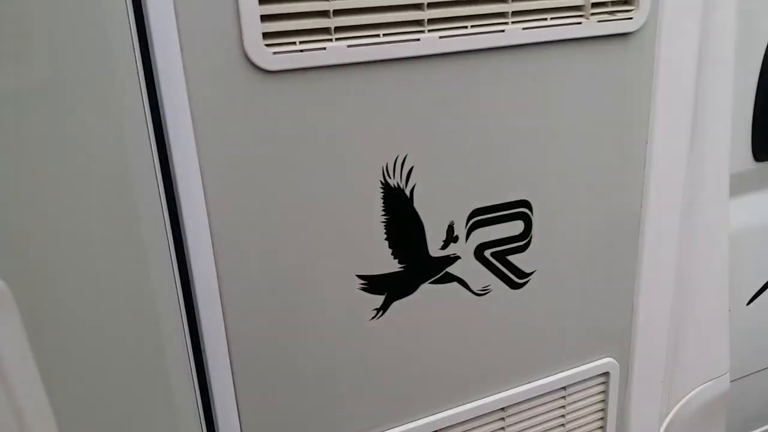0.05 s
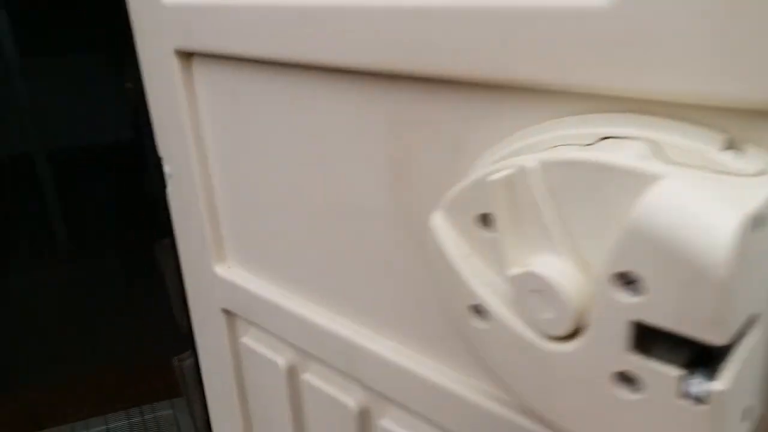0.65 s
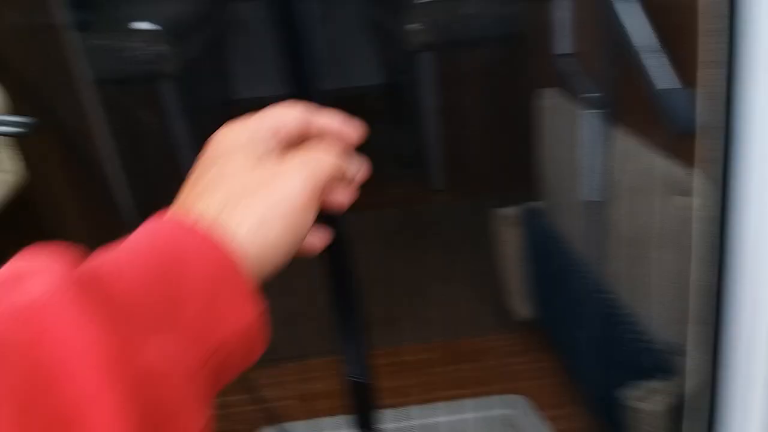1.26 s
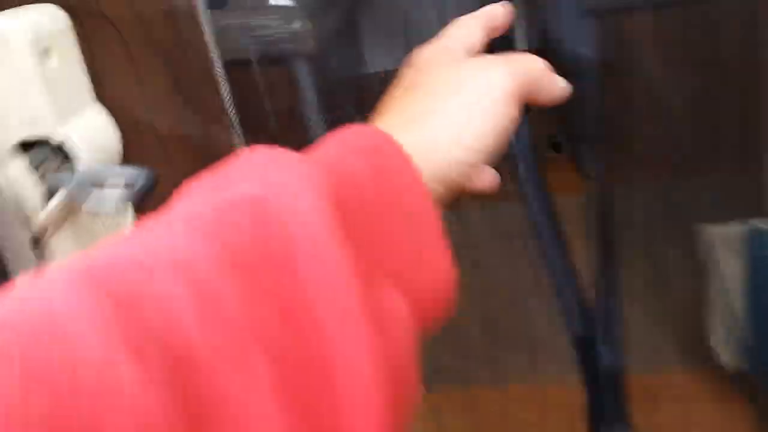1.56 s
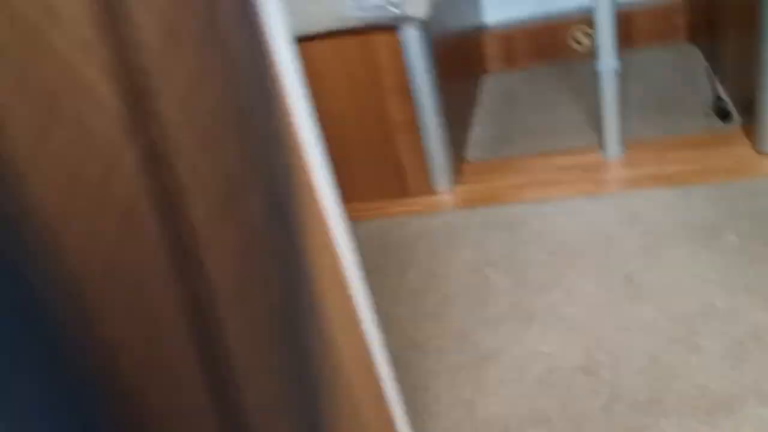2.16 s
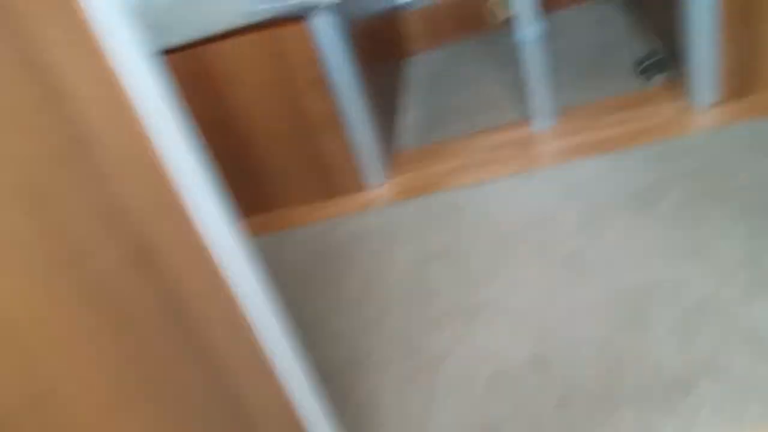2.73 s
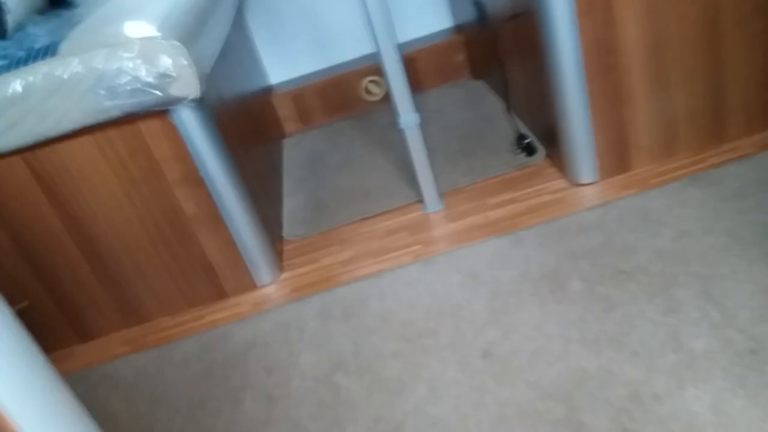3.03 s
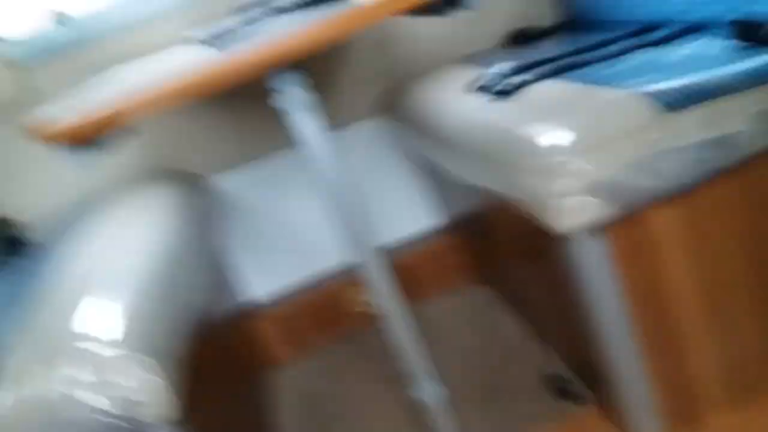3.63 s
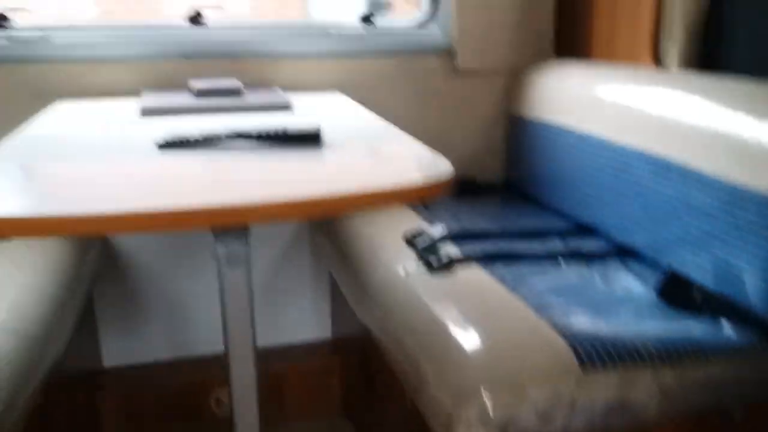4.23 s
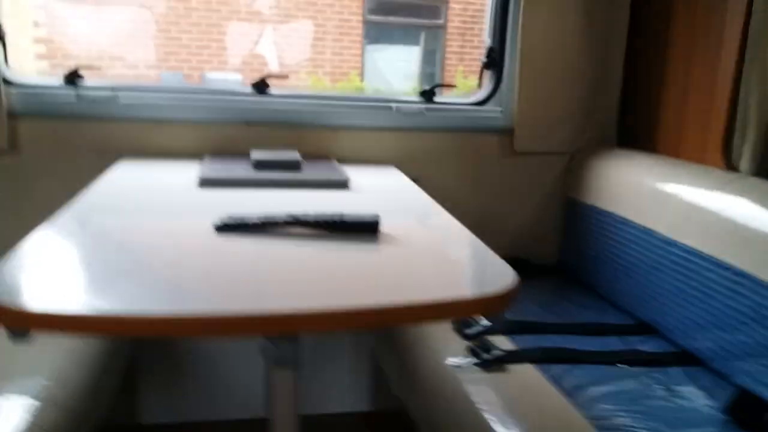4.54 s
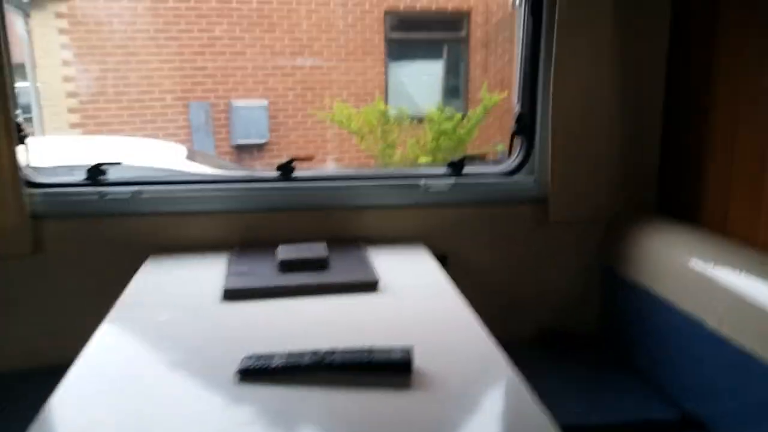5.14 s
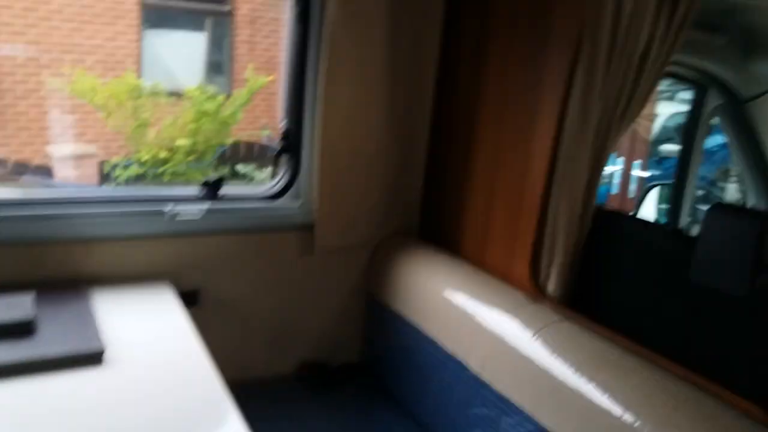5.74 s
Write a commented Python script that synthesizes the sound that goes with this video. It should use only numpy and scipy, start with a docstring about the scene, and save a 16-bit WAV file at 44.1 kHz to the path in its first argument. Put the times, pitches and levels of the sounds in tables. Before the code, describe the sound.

A stiff jacket rustles and snaps right at the microphone as someone enters a motorhome. At first a bird chirps faintly over a far road, wind puffs once and the door barely squeaks. A plastic door fitting clacks close by, then feet knock on the hollow floor while a hand rubs and rumbles on the microphone. Near the end, short hissing scrapes sound in the small cabin.

```python
"""A stiff jacket rustles and snaps right at the microphone, its folds buckling as the wearer carries
a camera through a motorhome doorway. Wind puffs once on one side of the microphone, the door squeaks
faintly, a plastic fitting clacks close by, feet knock on the hollow floor and the hand rubs and
rumbles on the camera. At first a bird chirps outside over a far road; near the end a run of short,
hissing scrapes sounds in the small cabin."""
import sys
import numpy as np
from scipy import signal
from scipy.fft import rfft, irfft
from scipy.io import wavfile
from scipy.ndimage import uniform_filter1d

SR = 44100
rng = np.random.default_rng(int(sys.argv[2]) if len(sys.argv) > 2 else 0)


def master_out(mix):
    """Clip the mix to full scale and print it as 16-bit PCM to the path in sys.argv[1]."""
    frames = np.transpose(np.atleast_2d(mix))
    ceiling = np.clip(frames, -1, 1)
    pcm = np.round(ceiling * 32767).astype(np.int16)
    wavfile.write(sys.argv[1], SR, pcm)


N = 259749
TIME = np.arange(N) / SR
SHORT, LONG = TIME[:2048], TIME[:16384]
MIDDLING_DB = -30  # a snap or thump of ordinary strength

# body movement: t/s, sliding cloth/dB, rubbing hand/dB
BODY_MOTION = [(0, -72, -68), (.22, -73, -64), (.27, -54, -62.5), (.44, -53, -53.5), (.65, -50, -57),
               (.71, -66, -63), (.79, -51.5, -56.5), (.87, -66, -60.5), (.9, -46, -53), (1.18, -47, -50.5),
               (1.23, -65, -64), (1.49, -59, -61), (1.55, -46, -52), (1.76, -42, -51), (1.81, -33, -50.5),
               (1.91, -42, -51.5), (2.03, -35, -50), (2.1, -51, -49.5), (2.42, -45, -55.5),
               (2.78, -51, -56.5), (2.93, -39.5, -55), (3.3, -50, -60), (3.52, -37, -54), (3.65, -49, -56),
               (4.1, -43.5, -54.5), (4.3, -55.5, -60), (4.5, -57, -57), (4.82, -51, -55),
               (4.96, -55.5, -67.5), (5.26, -60, -65), (5.5, -54, -49), (5.66, -58, -62), (5.89, -72, -80)]
# steps, bumps and, at 0.44 s, a low puff of wind on one side of the microphone:
# t/s, peak level/dB, lowest f/Hz, highest f/Hz, panel ring/dB, left-right/dB
THUMPS = [(.362, -35, 1010, 1590, -18, -5), (.440, -31, 75, 235, -7.5, 27),
          (0.558, -42.5, 69, 382, 4, 10.5), (0.653, -45.5, 160, 473, 8.5, 7), (.894, -40, 376, 563, 3.5, 5),
          (1.021, -28.5, 69.6, 715, -9, 7), (1.422, -43, 59.6, 132, -16, 25),
          (1.483, -43.5, 59.6, 110, -8, 24), (1.591, -24.5, 153, 425, -8, 3),
          (2.147, -25.5, 133, 406, 0.5, 2), (2.533, -34.5, 220, 900, -35, -14.5),
          (2.693, -39, 190, 384, -7, 4), (2.953, -25.5, 300, 2240, 2, -19), (2.98, -27, 131, 670, -4, -14),
          (3.371, -12.5, 121, 298, -8.5, 2.5), (3.731, -33, 400, 1700, -14.5, 6),
          (3.796, -27, 119, 940, -14, 5), (3.9863, -19, 470, 1910, -5.5, 5.5),
          (4.335, -10, 206, 503, -0.5, 4.5), (4.364, -24.5, 204, 300, 5.5, -1),
          (4.414, -31, 203, 380, -9, 3), (4.448, -37.5, 210, 380, -1, 2), (4.619, -21, 250, 2010, 2, 2),
          (4.648, -33.5, 148, 267, -5, 2), (4.804, -32, 255, 816, 5.5, 2.5),
          (5.361, -30, 50, 354, -17, 4.5), (5.376, -30, 45, 109, -16, 2), (5.3893, -12, 151, 850, -4, 3.5),
          (5.671, -38.5, 250, 780, -7.5, 0)]
# the jacket's loudest snaps: t/s, level/dB, f/Hz, bright part/dB, left-right/dB, buckling t60/s
FOLD_SNAPS = [(0.5543, -40, 7500, 3.5, 2, 0.01), (0.781, -47.5, 5570, 7, -4.5, .013),
              (0.8926, -38.5, 4800, 2, -6, .021), (0.9046, -35.5, 4700, -3, -6.5, 0.022),
              (0.931, -37.5, 4600, -5, -1, 0.06), (1.0201, -42.5, 4900, 1, 3.5, .017),
              (1.0443, -36.5, 5300, -2, 4.5, .012), (1.0516, -39.5, 4900, -1.5, -4, 0.04),
              (1.152, -32, 5000, -14.5, -1, 0.011), (1.1954, -41.5, 4640, -1, -3, 0.035),
              (1.3109, -29.5, 5300, -12.5, -3, 0.031), (1.5248, -26.5, 4160, -19, -2.5, .016),
              (1.5475, -29, 3350, -4, -1, 0.0087), (1.569, -24.5, 4430, -29.5, -10, .007),
              (1.5938, -24.5, 3760, -8, -7, 0.018), (1.6626, -29, 4260, -4, -6, .023),
              (1.7174, -26, 4060, -5.5, -2.5, 0.035), (1.7686, -16, 4400, -10.5, -1.5, 0.015),
              (1.8158, -30.5, 4400, 2, -2, 0.023), (1.8893, -22.5, 4330, -20, -2, 0.0077),
              (1.9227, -29.5, 2600, 0, 5, .022), (1.975, -26, 4100, -23, -3, .008),
              (1.9899, -24, 8300, -5, -1.5, .023), (1.999, -21, 4940, -1.5, -5.5, 0.02),
              (2.053, -20, 4400, -12, -1.5, 0.03), (2.064, -21.5, 4000, -14, -3, 0.022),
              (2.1296, -31, 2280, -4, -4, 0.032), (2.1825, -16.5, 4230, -14, -9, 0.014),
              (2.217, -33.5, 5100, 1.5, 11.5, 0.0037), (2.254, -40, 7300, 2.5, 4, 0.012),
              (2.3334, -16, 4480, -28, 7, 0.023), (2.3494, -27.5, 4200, -2.5, -2, 0.043),
              (2.394, -18.5, 4160, -17, -2, 0.0056), (2.4475, -15.5, 4580, -32, -4.5, 0.025),
              (2.4586, -21, 5850, -6, 1.5, 0.013), (2.5337, -34, 4500, -1.5, -10, 0.0039),
              (2.5662, -38.5, 5610, 3, 2, 0.01), (2.605, -21.5, 4300, -34, 4, 0.026),
              (2.6288, -33.5, 2420, 0, -12, 0.02), (2.67, -19.5, 4170, -26, 2, 0.012),
              (2.721, -28, 4200, -2, -3, 0.02), (2.81, -30.5, 7660, -1, -11, 0.0062),
              (2.8842, -32.5, 2920, -3.5, 1.5, .013), (2.9028, -19, 3800, -8, -13, 0.013),
              (2.9503, -31, 8000, 5, -16, 0.028), (2.9834, -26.5, 4200, -3, -5, .045),
              (3.068, -19, 3900, -7, -7, 0.0073), (3.074, -23.5, 4570, -6, -10, 0.02),
              (3.1091, -31.5, 4770, -21, -4, 0.014), (3.1328, -22, 4370, -21.5, -3.5, .016),
              (3.1442, -33.5, 2300, -19, -3, .032), (3.205, -33, 4540, -23, 0, 0.028),
              (3.2952, -35.5, 3860, 5, 3, 0.035), (3.3931, -29, 4030, -3.5, 1.5, 0.023),
              (3.4663, -15.5, 4240, -35.5, 3.5, 0.032), (3.4961, -30, 4400, -3.5, 6, 0.1),
              (3.5385, -18.5, 4960, -8, 7, .025), (3.593, -31.5, 3800, -15, 5, 0.041),
              (3.6827, -31, 4400, -31, 1, 0.033), (3.7625, -29.5, 3230, -8.5, 8, 0.037),
              (3.7754, -29.5, 4380, -17.5, 3, 0.02), (3.7905, -32.5, 4300, -12, -1, 0.054),
              (3.863, -30.5, 4260, -33, 5.5, .023), (3.9382, -32.5, 5000, -6, 3, 0.053),
              (3.9632, -32, 4290, -29, 3.5, 0.059), (4.127, -35.5, 5000, -26, 6.5, .006),
              (4.1398, -36.5, 4340, -25.5, 3.5, .05), (4.221, -37, 4160, -41, 2, 0.064),
              (4.4044, -42.5, 5200, -1.5, 3, 0.0055), (5.282, -27.5, 4750, -19, 10, 0.0058),
              (5.357, -35, 4320, -2, 1, 0.039), (5.4212, -25, 4400, -17, -.5, 0.064),
              (5.5284, -27.5, 4320, 3.5, 7, 0.017), (5.5773, -23.5, 5300, -3, 0, 0.023),
              (5.6697, -41.5, 4840, -7.5, -2, .004)]


def amp(db):
    """Decibels to gain."""
    return 10 ** (np.asarray(db) / 20)


def unit_rms(x):
    """Scales to a mean power of one."""
    return x / np.sqrt(np.mean(x ** 2) + 1e-20)


def unit_energy(x):
    """Scales each channel to an energy of one."""
    return x / np.sqrt(np.sum(x ** 2, -1, keepdims=True) + 1e-20)


def fade(t, t60):
    """Falls by 60 dB in t60 seconds."""
    return np.exp(-np.log(1000) * t / np.maximum(t60, 1e-4))


def read(points, hz):
    """Reads a table on a log-frequency axis."""
    f, value = np.transpose(points)
    return np.interp(np.log(hz + 1), np.log(f + 1), value)


def pan(db):
    """Left and right gains of constant power."""
    return unit_rms(amp([[db / 2], [-db / 2]]))


def add(mix, s, sound):
    """Mixes a stereo sound in at time s."""
    part = mix[:, max(round(s * SR), 0):][:, :sound.shape[-1]]
    part += sound[..., :part.shape[1]]


def convolve(x, response):
    """Convolves along time and keeps the length of x."""
    return signal.fftconvolve(np.atleast_2d(x), np.atleast_2d(response), axes=1)[:, :x.shape[-1]]


def cut(x, order, hz, keep="low"):
    """Low-pass or high-pass filter."""
    return signal.sosfilt(signal.butter(order, hz, keep, fs=SR, output="sos"), x)


def causal(spectrum, size=4096):
    """Minimum-phase impulse response with the given spectrum."""
    gains = amp(read(spectrum, np.fft.rfftfreq(size, 1 / SR)))
    cepstrum = irfft(np.log(gains))
    cepstrum[1:size // 2] *= 2
    cepstrum[size // 2 + 1:] = 0
    return unit_energy(irfft(np.exp(rfft(cepstrum)))[:size // 2])


def resonate(x, hz, width_hz):
    """Passes x through one resonance."""
    hz = min(hz, SR / 3)
    return signal.lfilter(*signal.iirpeak(hz, max(hz / width_hz, .5), fs=SR), x)


def ring(modes, t):
    """Damped sines that start at t = 0."""
    t = np.maximum(t, 0)
    return sum(amp(db) * fade(t, t60) * np.sin(2 * np.pi * hz * t) for hz, db, t60 in modes)


def noise(t, alike=0):
    """Stereo white noise as long as t, its channels correlated by alike."""
    left, other = rng.standard_normal((2, len(t)))
    alike = np.clip(alike, -1, 1)
    return np.array([left, alike * left + np.sqrt(1 - alike ** 2) * other])


def flutter(t, samples):
    """Random wavering of unit power, smoothed over so many samples."""
    return unit_rms(uniform_filter1d(rng.standard_normal(len(t)), size=samples))


def rough_glide(length_s, start_hz, end_hz, width_hz):
    """A gliding tone whose strength jitters, which smears it over width_hz."""
    t = np.arange(0, length_s, 1 / SR)
    jitter = cut(noise(LONG)[:, :len(t)], 2, width_hz / 2)
    glide = signal.chirp(t, start_hz, length_s, end_hz)
    return unit_rms(signal.windows.tukey(len(t), .5) * jitter * glide)


def wake(kicks, t60):
    """Strength over time of a movement that each (t/s, level/dB) kick sets off and that dies away."""
    power = np.zeros(N)
    for s, db in kicks:
        power[round(s * SR)] += amp(db) ** 2
    return np.sqrt(signal.lfilter([1], [1, -fade(1 / SR, t60) ** 2], power + 1e-24))


def motion(part):
    """Gain over time of the moving "cloth" or "hand"."""
    times, cloth_db, hand_db = np.transpose(BODY_MOTION)
    return amp(np.interp(TIME, times, {"cloth": cloth_db, "hand": hand_db}[part]))


def moments(part, count, crowding=1.4):
    """Random (t/s, level/dB) moments, crowded where that part moves briskly."""
    strength = motion(part)
    chance = np.cumsum(strength ** crowding)
    at = np.searchsorted(chance, chance[-1] * (np.arange(count) + rng.random(count)) / count)
    return zip(at / SR, 20 * np.log10(strength[at]))


def traffic(db=-62, inside_db=-12):
    """A far road, fading as the microphone passes through the doorway."""
    # road roar: f/Hz, level/dB
    spectrum = [(100, 3.5), (500, -23.5), (900, -0.5), (1150, 1.5), (1500, -7), (2200, -31), (5000, -31)]
    roar = unit_rms(convolve(noise(TIME, alike=0.16), causal(spectrum)))
    return roar * amp(db + np.interp(TIME, [.4, 2.5], [0, inside_db]))


def handling(rumble_db=-5, rub_jolt_db=-2, uneven_db=2):
    """Sleeve and hand rub unevenly; the carried camera rumbles; both swell after each thump."""
    # rubbing on the camera: f/Hz, level/dB
    rub_spectrum = [(120, -8.5), (220, 1), (450, -0.5), (700, -1), (1050, -3), (1500, -6), (2200, -11),
                    (4000, -23.5)]
    # rumble of the camera body: f/Hz, level/dB
    rumble_spectrum = [(20, -33.5), (40, -10), (65, 1.5), (100, 2.5), (190, -0.5), (300, -11), (600, -50)]
    moving = motion("hand")
    jolts = wake([(s, -42 + 0.5 * db) for s, db, *_ in THUMPS], t60=0.4)
    grip = amp(uneven_db * flutter(TIME, samples=700))
    rub = convolve(grip * noise(TIME, alike=0.52), causal(rub_spectrum))
    rumble = convolve(noise(TIME, alike=0.88), causal(rumble_spectrum, size=16384))
    return (np.hypot(moving, amp(rub_jolt_db) * jolts) * unit_rms(rub)
            + np.hypot(amp(rumble_db) * moving, jolts) * unit_rms(rumble))


def rustle(ticks_per_s=800, spread_db=4, crinkle_db=2, slide_db=-4, clump_db=4, slip_db=-19.5):
    """Sliding cloth hisses while tiny creases tick in clumps; fast movement creases it harder."""
    # jacket cloth, close up: f/Hz, level/dB
    spectrum = [(900, -23), (1600, -7), (2300, -0.5), (3200, -4.5), (4300, 3.5), (5600, -1), (7600, -2),
                (9500, -16), (13000, -16.5), (16000, -19)]
    slips = wake([(s, db + slip_db) for s, db, *_ in FOLD_SNAPS], t60=0.18)  # freed cloth slides on
    speed = np.hypot(motion("cloth"), slips)
    crinkle, pitches = np.zeros((2, N)), np.geomspace(2200, 7600, num=12)
    for hz in pitches:
        at = rng.integers(0, N, int(ticks_per_s * N / SR / len(pitches)))
        strength = amp(spread_db * np.minimum(rng.exponential(1, len(at)), 3))
        ticks = np.zeros((2, N))
        ticks[:, at] = strength * rng.uniform(-1.07, 1, (2, len(at)))
        crinkle += resonate(ticks, hz, width_hz=800) + 0.14 * ticks
    clumps = amp(clump_db * np.tanh(flutter(TIME, samples=300)))
    colour = causal(spectrum)
    creasing = clumps * np.sqrt(speed / speed.max()) * unit_rms(convolve(crinkle, colour))
    slide = unit_rms(convolve(noise(TIME, alike=0.016), colour))
    return speed * (amp(crinkle_db) * creasing + amp(slide_db) * slide)


def bird(gain_db=-6, echo_db=-1, echo_t60=0.72, side_db=8):
    """Thin, raspy rising chirps off to the left, scattered by the walls outside."""
    # upward flicks: t/s, relative level/dB, start f/Hz, end f/Hz
    chirps = [(.008, -55, 7950, 8500), (0.122, -46, 5820, 8460), (0.321, -40, 6230, 8320),
              (.368, -39.5, 6500, 7700)]
    out = np.zeros((2, N))
    for s, db, start_hz, end_hz in chirps:
        chirp = rough_glide(0.0157, start_hz, end_hz, width_hz=580)
        add(out, s, amp(gain_db + db) * pan(side_db) * chirp)
    walls = unit_energy(noise(LONG) * fade(LONG, echo_t60))
    return out + amp(echo_db) * convolve(out, walls)


def small_knocks(count=26, over_db=8, spread_db=2.5, low_hz=140, high_hz=520, ring_db=-6):
    """Light bumps of hand and elbow come at random while the hand is busy; rows as in THUMPS."""
    rows = []
    for (s, db), (force, pitch, side) in zip(moments("hand", count), rng.uniform(-2, 2.2, (count, 3))):
        level_db = db + over_db + spread_db * force
        shift = 2 ** (0.65 * pitch)
        rows.append((s, level_db, low_hz * shift, high_hz * shift, ring_db, 4 * side))
    return rows


def thumps(grit_db=-31):
    """Steps, bumps and a one-sided puff of wind: each a short push, with panel and cabin ring."""
    # floor and wall panel modes: f/Hz, level/dB, t60/s
    panel_modes = [(160, -13.5, 0.14), (230.8, -3, 0.16), (262, -4.5, 0.058), (312, -15.5, 0.096),
                   (386, -8.5, 0.13), (495, -1.5, 0.077), (682, -5.5, 0.14), (822, -8.5, 0.11),
                   (1087, -4.5, 0.082)]
    out, panels = np.zeros((2, N)), ring(panel_modes, LONG)
    for s, db, low_hz, high_hz, ring_db, side_db in THUMPS + small_knocks():
        pulse = cut(signal.unit_impulse(len(LONG)), 4, low_hz, "high")
        push = unit_energy(cut(pulse, 7, high_hz) + amp(grit_db) * cut(pulse, 2, 3 * high_hz))
        ringing = unit_energy(convolve(push, panels))
        room = cabin(alike=1.45 * np.exp(-(high_hz / 1500) ** 2))
        # shaken panels fill the cabin; loud thumps are near, so drier
        tail_db = -0.5 + 0.76 * ring_db - 0.0617 * (db - MIDDLING_DB)
        sound = push + amp(ring_db) * ringing + amp(tail_db) * unit_energy(convolve(push, room))
        add(out, s, amp(db) * pan(side_db) * sound / abs(push).max())
    return out


def cabin(alike):
    """Dense reflections of a small furnished room, each band dying at its own speed."""
    # cabin reverberation: f/Hz, t60/s
    decay_times = [(80, 0.52), (250, 0.095), (800, 0.15), (3000, 0.16), (7000, 0.079), (15000, 0.034)]
    hz, t, bands = signal.stft(noise(LONG, alike), SR, nperseg=256)
    _, tail = signal.istft(bands * fade(t, read(decay_times, hz)[:, None]), SR, nperseg=256)
    onset = np.clip(LONG / 0.002 - .5, 0, 1)
    return unit_energy(tail[:, :len(LONG)] * onset)


def scuffs(scuff_db=-27, db_per_octave=5, middling_hz=500):
    """A short, dull crunch goes with each row of THUMPS, strongest where a hard contact scuffs."""
    # scuff of a sole or sleeve: f/Hz, level/dB
    spectrum = [(100, -14.5), (500, -2), (1000, 5), (2000, -1.5), (3000, -5.5), (5500, -2), (9000, -22),
                (16000, -35)]
    kicks = [(s, db + scuff_db + db_per_octave * np.log2(high_hz / middling_hz))
             for s, db, _, high_hz, *_ in THUMPS]
    return convolve(wake(kicks, t60=0.079) * noise(TIME, alike=.45), causal(spectrum))


def scrapes(width_hz=900, tone_db=-5, grain_db=3):
    """Quick, grainy bursts of friction nearby, each with one broad resonance."""
    # scraping strokes: t/s, level/dB, rise/s, t60/s, f/Hz, left-right/dB
    strokes = [(0.435, -44.5, 0.012, 0.14, 2550, -2), (.640, -46.5, .015, 0.089, 7300, -10),
               (0.883, -35, 0.0051, 0.18, 5550, 1), (1.309, -42, 0.0016, 0.15, 5950, 1),
               (2.0198, -11.5, 0.0015, 0.022, 4640, 8), (2.141, -20.5, .008, 0.11, 7400, -2.5),
               (5.28, -28, 0.0025, 0.12, 4800, 3), (5.348, -29.5, 0.013, 0.13, 4470, 2),
               (5.415, -28, 0.0064, 0.16, 4530, 4), (5.463, -27, .005, 0.18, 4360, 2),
               (5.524, -26, 0.0071, 0.15, 4500, 2), (5.575, -24, 0.0023, 0.13, 5160, 6),
               (5.719, -39.5, .004, 0.19, 4600, 1.5)]
    # friction hiss: f/Hz, level/dB
    spectrum = [(200, -40), (1000, -21), (2000, -9), (3000, -10), (4600, -1.5), (7300, -2.5), (10000, -22),
                (13000, -18), (16000, -29)]
    out, colour = np.zeros((2, N)), causal(spectrum)
    for s, db, rise, t60, hz, side_db in strokes:
        friction = amp(grain_db * flutter(LONG, samples=60)) * noise(LONG)
        hiss = unit_rms(convolve(friction, colour))
        tone = amp(tone_db) * unit_rms(resonate(friction, hz, width_hz))
        envelope = np.minimum(LONG / rise, 1) * fade(np.maximum(LONG - rise, 0), t60)
        add(out, s, amp(db) * pan(side_db) * envelope * unit_rms(hiss + tone))
    return out


def hinge(start_s=.515, db=-58):
    """The swinging door gives a faint, rough squeak that rises."""
    out = np.zeros((2, N))
    add(out, start_s, amp(db) * rough_glide(length_s=.15, start_hz=2250, end_hz=2530, width_hz=280))
    return out


def snaps(crumple_db=-11, crumple_t60=0.037, span_s=0.0052):
    """A fold buckles in milliseconds and crumples on briefly; the fabric rings for a few cycles."""
    # dull part of a snap: f/Hz, level/dB
    dull_spectrum = [(30, -29.5), (120, -4.5), (250, 2), (600, -5.5), (1200, 5.5), (2100, 14.5), (3000, -6),
                     (5000, -31.5), (9000, -68)]
    # bright part of a snap: f/Hz, level/dB
    bright_spectrum = [(2000, -10.5), (4500, 5), (7300, 11), (9500, -6.5), (12500, -4.5), (16000, -9.5)]
    out, dull, bright = np.zeros((2, N)), causal(dull_spectrum), causal(bright_spectrum)
    for s, db, hz, bright_db, side_db, buckle_t60 in FOLD_SNAPS + small_snaps():
        buckle = unit_energy(noise(SHORT, alike=0.25) * fade(SHORT, buckle_t60))
        crumple = unit_energy(noise(SHORT) ** 3 * fade(SHORT, crumple_t60))
        jerk = buckle + amp(crumple_db) * crumple
        release = np.zeros((2, len(SHORT)))
        lag = int(np.clip(round(side_db), -8, 8))  # samples: the nearer port hears it first
        release[[0, 1], [max(-lag, 0), max(lag, 0)]] = 1
        release *= 2 * np.exp(-buckle_t60 / 0.02)  # a quick snap lets go all at once
        tone = resonate(resonate(jerk + release, hz, width_hz=650), hz, width_hz=3360)
        # the dull part is weaker in hard snaps, stronger in bright ones
        dull_db = -12 - 0.376 * (db - MIDDLING_DB) + .25 * bright_db
        sound = (unit_energy(tone) + amp(dull_db) * unit_energy(convolve(jerk, dull))
                 + amp(bright_db) * unit_energy(convolve(jerk, bright)))
        add(out, s, amp(db) * np.sqrt(span_s * SR) * pan(side_db) * sound)
    return out


def small_snaps(count=64, over_db=3, spread_db=2, hz=4450, bright_db=-7, t60=0.023):
    """Lesser folds give way at random, more often and harder in fast movement; rows as in FOLD_SNAPS."""
    folds = zip(moments("cloth", count), rng.standard_normal((count, 3)))
    return [(s, db + over_db + spread_db * force, hz * 2 ** (0.22 * pitch), bright_db, 4 * side, t60)
            for (s, db), (force, pitch, side) in folds]


def clack(start_s=2.0214, db=-13, right_lag_s=0.00045, lowest_hz=560, chatter_db=-4, chatter_t60=.02):
    """A plastic door fitting, too small to radiate bass, is struck near the microphone and chatters."""
    # modes of the fitting: f/Hz, level/dB, t60/s
    modes = [(877, 3.5, 0.021), (826, -12, 0.12), (1088, -1.5, 0.025), (1656, 0.5, 0.013),
             (1910, 0.5, 0.019), (2460, -6, 0.022), (3300, -12, .014), (4900, -26.5, 0.014)]
    out = np.zeros((2, N))
    contacts = amp(chatter_db) * unit_energy(noise(LONG) * fade(LONG, chatter_t60))
    contacts[:, 0] += 1  # the first strike
    fitting = ring(modes, LONG - np.array([[0], [right_lag_s]]))
    add(out, start_s, amp(db) * convolve(contacts, fitting))
    return cut(out, 3, lowest_hz, "high")


def scene(room_db=-15):
    """Close sounds with a little of the cabin, over thumps, handling noise and the outdoors."""
    near = snaps() + clack() + scrapes() + hinge()
    room = amp(room_db) * convolve(near, cabin(alike=0.1))
    return near + room + rustle() + thumps() + scuffs() + handling() + bird() + traffic()


def record(dry):
    """The microphone rounds the highest peaks and drops the deepest bass and the top of the treble."""
    thinned = cut(np.tanh(dry), order=5, hz=50, keep="high")
    band_limit = signal.firwin(255, cutoff=16300, window=("kaiser", 9), fs=SR)
    return signal.oaconvolve(thinned, band_limit[None], "same")


dry = scene()
out = record(dry)
master_out(out)
```